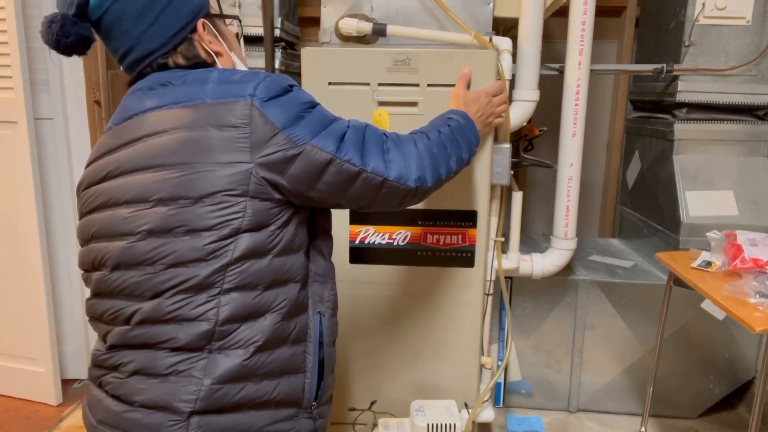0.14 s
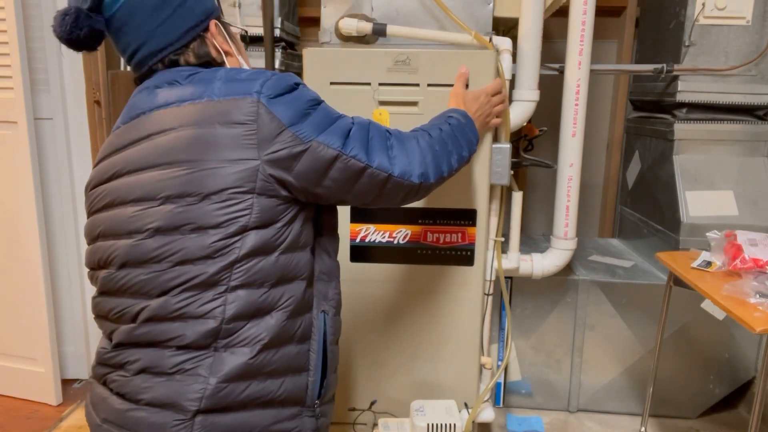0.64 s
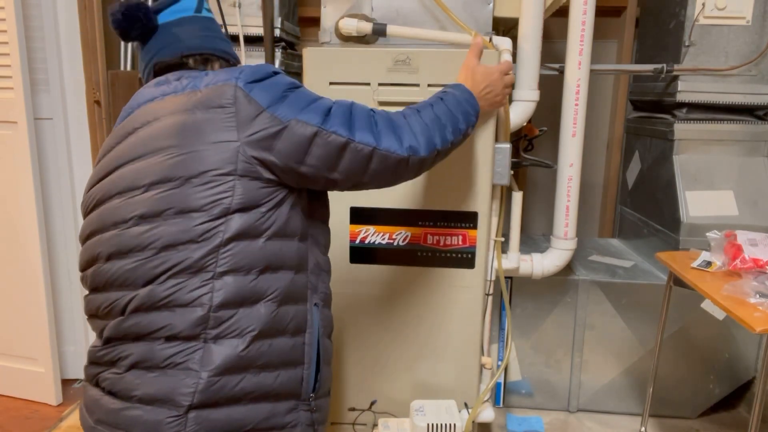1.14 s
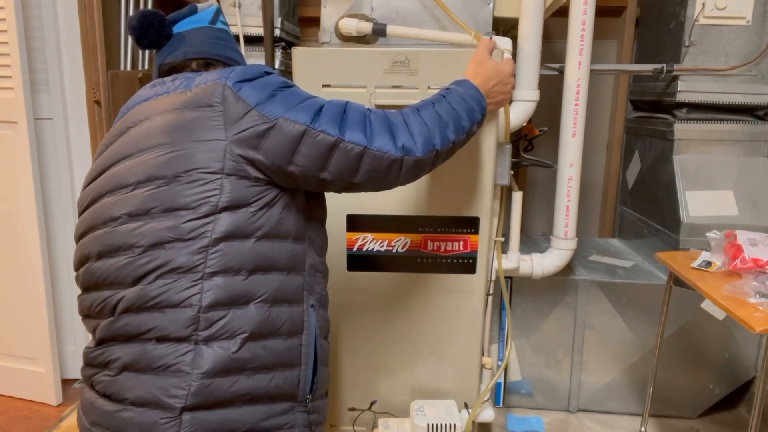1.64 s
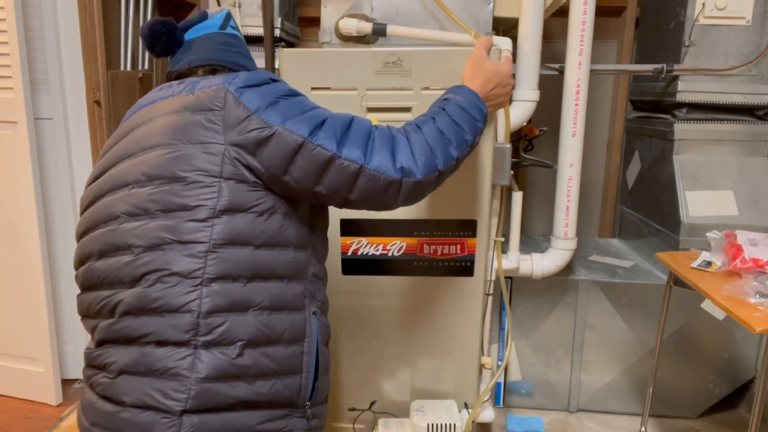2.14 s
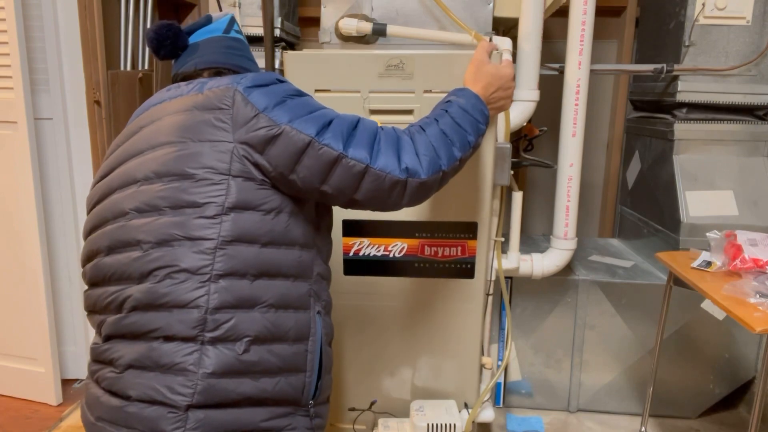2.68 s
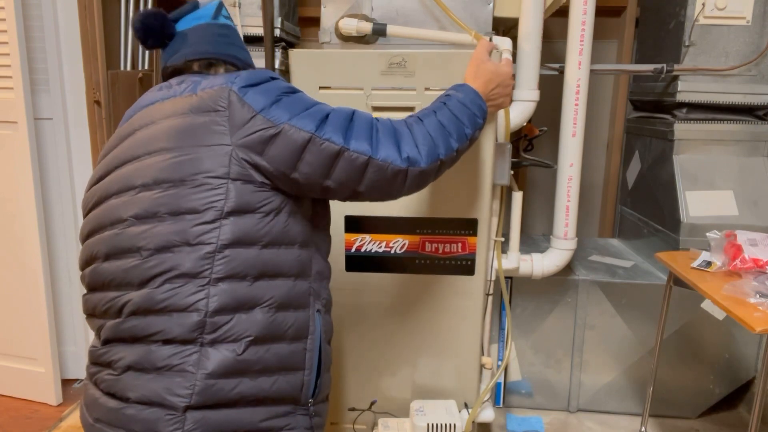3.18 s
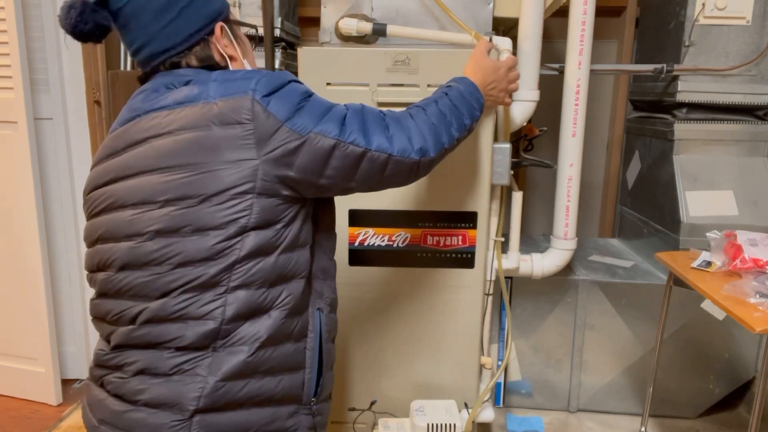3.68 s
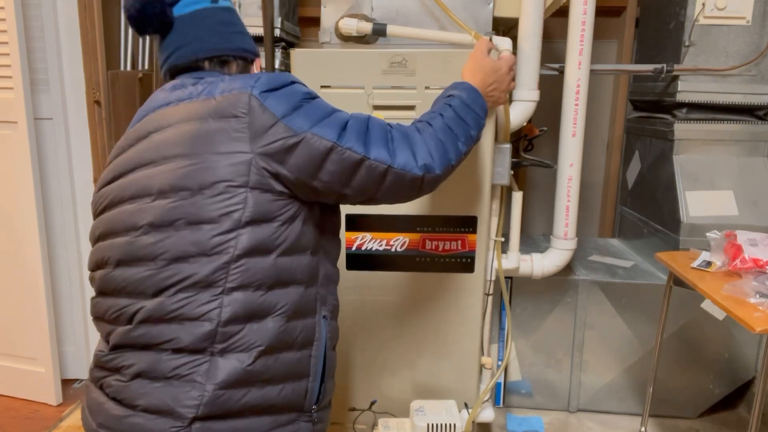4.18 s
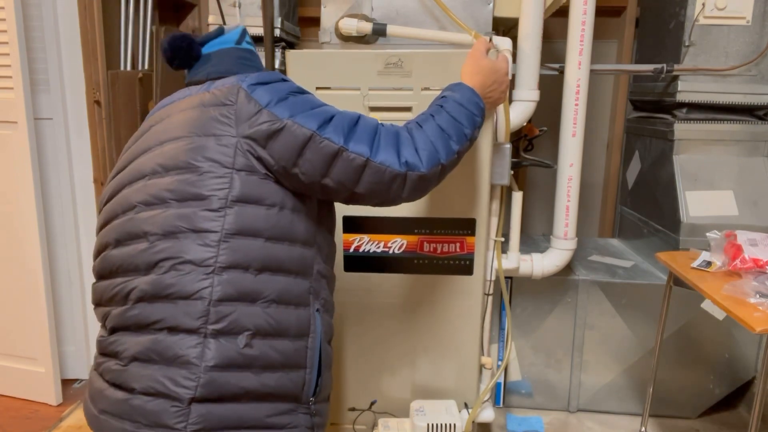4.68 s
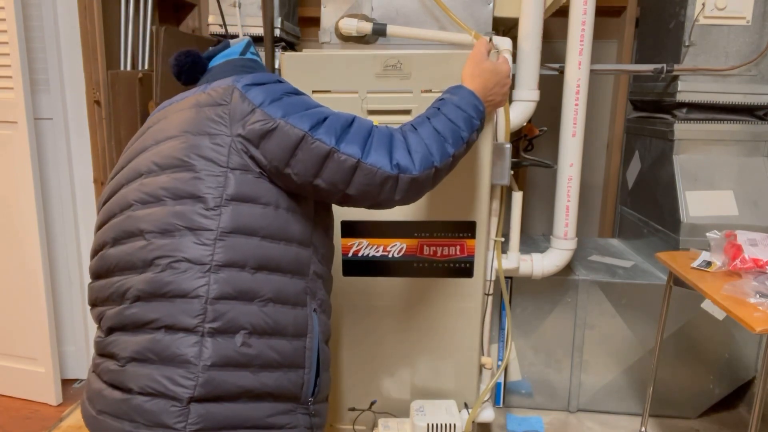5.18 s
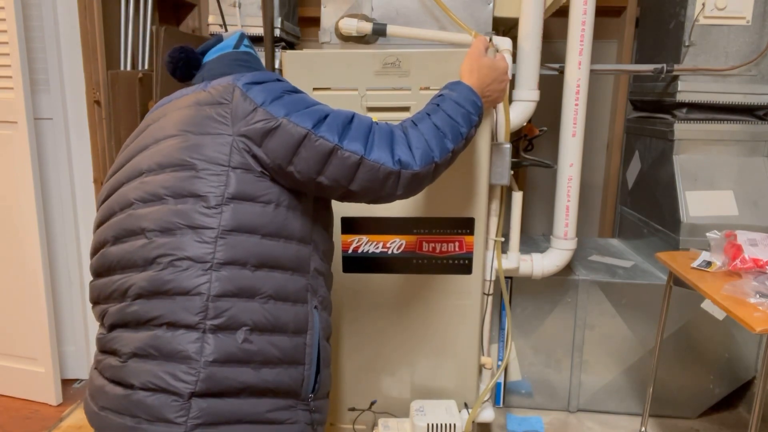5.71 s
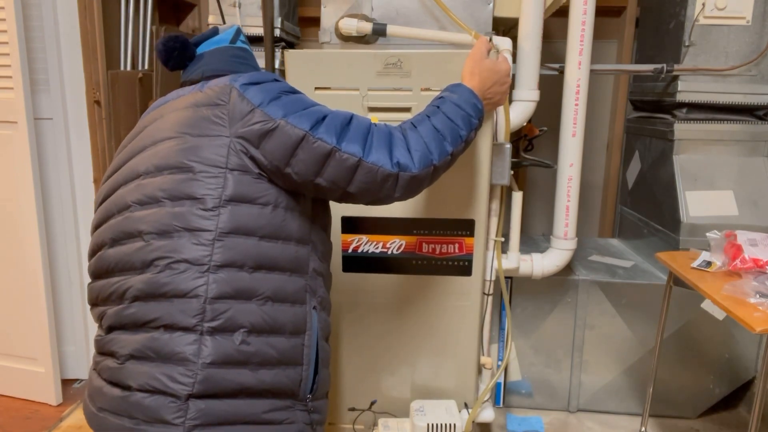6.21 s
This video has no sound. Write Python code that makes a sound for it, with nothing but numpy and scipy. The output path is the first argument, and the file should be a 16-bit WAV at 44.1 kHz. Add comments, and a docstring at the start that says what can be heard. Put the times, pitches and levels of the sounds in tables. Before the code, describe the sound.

A quiet basement with low steady house rumble and faint hiss, heard closely in stereo. Barely audible touches on sheet metal open it; at 0.4 s a quick double clunk with short hollow ring, then a softer tap at 0.6 and a jacket rustle. A light tick comes at 1.1. From 1.6 the panel is shifted: clustered knocks, edge scrape and wobbling low metal rumble, building to a hard bang at 2.14 with rapid clunks until about 2.3, nylon swishing through it. It calms near 2.7. A clunk at 3.1, a sharp bang at 3.34, and the loudest knock at 3.66, followed by rustle and scraping rumble around 3.9. Small taps at 4.0 and 4.5, a faint trembling squeak from 4.55 to 4.8, a tick at 4.87. Near-quiet, then a burst of clunks at 5.8-5.9, strongest at 5.87, and a last moderate knock at 6.3.

```python
"""In a basement, a sheet-metal panel is lifted, slid and knocked into a furnace cabinet.
Each contact adds an edge ping, the decaying modes of the hand-damped sheet and a wash of filtered noise.
Bursty noise through the sheet's modes makes the hands' scrape and rumble; shaped noise is a nylon jacket.
Once the edge squeaks on its rail, a trembling tone with overtones; house rumble and hiss lie beneath.
Two spaced microphones hear it, the left one first."""
import sys
import numpy as np
from scipy import signal
from scipy.fft import rfft, irfft, next_fast_len
from scipy.io import wavfile
from scipy.ndimage import uniform_filter1d, map_coordinates

SR = 44100
rng = np.random.default_rng(int(sys.argv[2]) if len(sys.argv) > 2 else 0)


def volts(x):
    """Linear amplitude factor 10**(x/20) for a level x in dB, scalar or array-like."""
    e = np.asarray(x, float) / 20
    return 10 ** e


def wav_record(signal):
    """Record a signal, one row per channel, as 16-bit PCM in the file named by sys.argv[1]."""
    frames = np.transpose(np.atleast_2d(signal))
    bounded = np.clip(frames, -1, 1)
    # unit amplitude maps onto the largest positive 16-bit level
    quanta = np.round(bounded * 32767).astype(np.int16)
    wavfile.write(sys.argv[1], SR, quanta)


N = 279153  # length in samples
CONTROL_STEP = 64  # samples between points of the slow gains

# steady house sound, relative spectrum: [f/Hz, level/dB per Hz]
HOUSE_SPECTRUM = [(15, -45.5), (25, -20), (42, -12.5), (64, -0.5), (86, -15.5), (169, -29), (198, -22.5),
                  (433, -28), (482, -26), (523, -30.5), (1380, -34.5), (8810, -43), (15500, -60)]
# likeness of left and right: [f/Hz, correlation]
LEFT_RIGHT_LIKENESS = [(60, 0.81), (130, 0.86), (290, 0.59), (640, 0.16), (1200, 0.048), (6500, 0.041),
                       (8300, 0.85), (15000, 0.795)]
# phase by which the left microphone leads: [f/Hz, lead/half turns]
LEFT_LEAD = [(0, 0), (700, .42), (1600, .7), (8900, 5), (11500, 6), (14000, 7), (22050, 10)]
# nylon cloth, relative spectrum: [f/Hz, level/dB per Hz]
NYLON_SPECTRUM = [(700, -41.5), (1200, 0.5), (3000, -2.5), (6500, -5.5), (9000, -7.5), (12500, -11.5),
                  (14000, -10.5), (15800, -24.5)]
# jacket swishes: [start t/s, length t/s, level at start/dB, level at end/dB]
JACKET_SWISHES = [(0, 0.63, -81, -68.5), (0.619, 0.3, -63.5, -61.5), (0.96, 0.16, -69, -75),
                  (1.109, 0.59, -62.5, -73.5), (1.868, 0.085, -65.5, -61.5), (2.155, 0.14, -57.5, -53),
                  (2.44, 0.072, -54.5, -51), (2.934, .14, -86.5, -68.5), (3.098, 0.5, -61, -65),
                  (3.698, 0.21, -52.5, -60.5), (3.965, .7, -65.5, -75), (4.891, 0.16, -63, -75.5),
                  (5.05, .22, -89, -87), (5.301, 0.19, -80.5, -70), (5.566, 0.39, -76, -82),
                  (5.804, .05, -70, -64), (6.147, 0.15, -88, -76)]
# hands on the sheet: [t/s, edge scrape level/dB, sheet rumble level/dB]
HAND_LEVELS = [(0, -79.5, -78), (.28, -81, -75), (.59, -57.5, -61.5), (1.0, -70, -78), (1.58, -68, -69),
               (1.7, -51, -61), (1.8, -54, -43.5), (1.92, -56, -52), (2.03, -61.5, -49), (2.3, -56.5, -46),
               (2.55, -55.5, -57), (2.72, -94, -68.5), (3.03, -86, -79.5), (3.2, -60, -67.5),
               (3.58, -68, -55.5), (3.88, -55, -43), (4.3, -74.5, -63.5), (4.57, -93, -71.5),
               (4.93, -72, -68.5), (5.3, -90, -84.5), (5.55, -71, -75.5), (6.05, -75.5, -53.5),
               (6.33, -81, -62.5)]
# modes of the sheet, before the contact colours and damps them: [f/Hz, relative level/dB, t60/s]
SHEET_MODES = [(54.7, -5, 0.43), (93.95, -4, 0.57), (125, 0.5, 0.74), (166, -1, 0.66), (201, -4, 0.67),
               (241, -2.5, 0.44), (279.9, -3.5, 0.6), (346, -5, 0.29), (414, -1, 0.48), (447.4, -3, 0.37),
               (480, -8.5, 0.75), (520.6, 2, 0.25), (633.7, 4, 0.23), (702.6, 1, 0.4), (780, -2.5, .33),
               (860, 6, 0.14), (955, 2, 0.23), (1051, -1.5, 0.42), (1127, -4, 0.45), (1252, -1.5, 0.22),
               (1334, -16, 0.37), (1737, -4, 0.21), (2120, -5.5, 0.51), (2300, -18.5, 0.47),
               (2430, -20, 0.34), (2870, -20, 0.26), (3300, -14.5, .4)]
# contacts: [t/s, edge level/dB, boom over edge/dB, clatter over edge/dB, favoured boom f/Hz, favoured edge f/Hz]
CONTACTS = [(0.068, -82, 30.5, -15, 93.5, 900), (0.201, -74, 18.5, -1, 70, 890),
            (.404, -56.5, -2, -4, 212, 2430), (.413, -41.5, 2.5, -5.5, 222, 1060),
            (.445, -46.5, 9.5, -17, 92, 980), (.601, -51.5, -1.5, -21, 125, 964),
            (.82, -66.5, 12, -8, 125, 860), (1.105, -56, -13, -7, 102, 2120),
            (1.62, -62, 12.5, -3, 260, 480), (1.642, -50, -7, -4.5, 241, 934),
            (1.657, -45.5, -1.5, -9, 241, 955), (1.743, -44, 12.5, -8.5, 198, 482),
            (1.862, -47.5, 18, 0, 125, 676), (1.938, -51.5, 12.5, -8.5, 125, 934),
            (2.08, -41.5, 3, -13, 320, 1370), (2.141, -26.5, -5.5, -13.5, 201, 1330),
            (2.173, -32.5, 4.5, -18, 268, 504), (2.212, -36, 2.5, -3.5, 201, 860),
            (2.269, -42, 11.5, -27, 166, 780), (2.431, -60, -1.5, 7, 166, 935),
            (2.488, -53, 13, 13, 201, 910), (3.097, -49.5, 7.5, -6.5, 250, 480),
            (3.21, -59.5, -6, 4, 260, 2120), (3.339, -26.5, -2, -23, 250, 903),
            (3.651, -48, -10, -12, 292, 860), (3.662, -20, -4, -18.5, 312, 890),
            (4.028, -52, -6, -15.5, 125, 893), (4.523, -50, -11.5, -31, 231, 917),
            (4.874, -54, -4, -3, 346, 2220), (5.51, -60.5, -10, -10, 171, 900),
            (5.597, -64, 11.5, -6, 164, 940), (5.8, -51.5, -11.5, -11, 200, 900),
            (5.824, -42, -7.5, -12, 202, 917), (5.852, -47, 2, -10, 300, 480),
            (5.867, -31.5, -0.5, -14, 346, 703), (5.909, -38.5, 12.5, -30, 204, 486),
            (6.154, -67.5, 10, 7, 167, 2430), (6.31, -46, 4.5, -18, 241, 888)]
# decay of dense high modes and walls together, before damping: [f/Hz, t60/s]
WASH_DECAY = [(100, 0.34), (400, 0.81), (1000, 0.42), (3000, 0.38), (10000, 0.28)]
# wash of a contact, relative spectrum: [f/Hz, level/dB per Hz]
WASH_SPECTRUM = [(300, 6.5), (700, 12.5), (1100, 12), (1700, 12), (2500, 12.5), (3500, 8), (5000, 3.5),
                 (8000, -3), (12500, 8), (14000, -11), (15800, -21.5), (16200, -58.5)]
# edge slipping on its rail: [t/s, mean slip rate f/Hz, first partial relative level/dB, second likewise/dB]
SQUEAK_TRACK = [(4.55, 426, -54, -69), (4.578, 455, -73, -78), (4.598, 463, -57, -54),
                (4.672, 464, -55.5, -79), (4.728, 455, -62.5, -77), (4.762, 464, -82, -105),
                (4.83, 465, -75.5, -102)]


def unit(x):
    """Scale to rms 1."""
    return x / np.sqrt(np.mean(x ** 2) + 1e-20)


def along(points, hz):
    """Read (frequency, value) points on a log frequency axis."""
    f, v = np.transpose(points)
    return np.interp(np.log(hz + 1), np.log(f + 1), v)


def curves(rows):
    """One value per sample for each column after the time."""
    s, *cols = np.transpose(rows)
    return [np.interp(np.arange(N) / SR, s, c) for c in cols]


def stepwise(gain):
    """Root of the summed power of all rows of a slow gain, read at every sample."""
    total = np.sqrt(np.sum(gain ** 2, 0))
    return np.interp(np.arange(N), np.arange(0, N, CONTROL_STEP), total)


def wobble(rate):
    """A smooth random curve, rate knots a second."""
    knots = rng.standard_normal(int(N * rate / SR) + 4)
    return map_coordinates(knots, [np.arange(N) * rate / SR])


def rough(rate, depth_db):
    """Two noises swelling together in uneven bursts, fast and slow."""
    bursts = wobble(rate) + wobble(rate / 6)
    return rng.standard_normal((2, N)) * volts(depth_db * bursts)


def filtered(x, response):
    """Filter by a complex response of frequency."""
    m = next_fast_len(x.shape[-1] + SR // 2)
    spectrum = rfft(x, m) * response(np.fft.rfftfreq(m, 1 / SR))
    return irfft(spectrum, m)[..., :x.shape[-1]]


def likeness_angle(hz):
    """Angle whose cosine is the left-right likeness."""
    return np.arccos(np.clip(along(LEFT_RIGHT_LIKENESS, hz), -1, 1))


def stereo(pair, response):
    """Mix two unrelated noises as mid and side, so left and right are as alike as the table says."""
    def mid_side(hz):
        half = likeness_angle(hz) / 2
        return response(hz) * [np.cos(half), np.sin(half)]
    mid, side = filtered(pair, mid_side)
    return np.array([mid + side, mid - side])


def basement():
    """Steady house rumble and hiss, noise with slightly uneven level."""
    noise = rough(12, depth_db=1.5)
    return volts(-67) * unit(stereo(noise, lambda hz: volts(along(HOUSE_SPECTRUM, hz))))


def swishes():
    """Gain of the cloth: each swish rises, drifts from its first to its last level and fades."""
    rise_db_per_s, fade_db_per_s = 701, 252.5
    start, length, first_db, last_db = np.transpose(JACKET_SWISHES)[:, :, None]
    t = np.arange(0, N, CONTROL_STEP) / SR - start
    level = first_db + (last_db - first_db) * np.clip(t / length, 0, 1)
    level += rise_db_per_s * np.minimum(t, 0)
    level -= fade_db_per_s * np.maximum(t - length, 0)
    return stepwise(volts(level))


def jacket():
    """Nylon rustles: grainy broadband noise that follows the swishes."""
    noise = rough(160, depth_db=-0.66)
    cloth = unit(stereo(noise, lambda hz: volts(along(NYLON_SPECTRUM, hz))))
    return swishes() * cloth


def resonant(hz, lowest_hz, highest_hz, widen):
    """The sheet's modes between two frequencies as one causal filter, broadened by widen."""
    total = 0
    for k, (centre, db, t60) in enumerate(SHEET_MODES):
        if lowest_hz <= centre < highest_hz:
            loss = 1j * hz * widen / t60
            total = total + (-1) ** k * volts(db) * loss / (centre * centre - hz * hz + loss)
    return total


def hands():
    """Fingers, rail and shudder drive the sheet's upper modes as scrape and lower modes as rumble."""
    scrape_db, rumble_db = curves(HAND_LEVELS)
    edge, body = shudder()
    scrape = unit(stereo(rough(90, depth_db=1.2), lambda hz: resonant(hz, 400, 3600, widen=7)))
    rumble = unit(stereo(rough(30, depth_db=2.0), lambda hz: resonant(hz, 0, 400, widen=8.4)))
    return np.hypot(volts(scrape_db), edge) * scrape + np.hypot(volts(rumble_db), body) * rumble


def modal_ring(t, colour, boom_hz, edge_hz, rise, damping):
    """Decaying sines of the sheet's modes, the boom building slower than the edge."""
    hz, db, t60 = np.transpose(SHEET_MODES)[:, :, None]
    # the place struck drives some modes best
    favour_db = 9 * np.exp(-(np.log(hz / boom_hz) / 0.27) ** 2)
    favour_db += 8 * np.exp(-(np.log(hz / edge_hz) / 0.1) ** 2)
    level = db + colour(hz) + favour_db - 8.5
    level += rng.normal(0, 2.5, hz.shape)
    swell = 1 - np.exp(-t / (rise + 0.0017 + 0.011 * 300 / hz))
    apart = 0.9 * likeness_angle(hz) * rng.normal(0, 1, hz.shape)  # left-right phase, radians
    phase = 2 * np.pi * (hz * t + rng.random(hz.shape))
    shape = volts(level - 60 * t * damping / t60) * swell
    beat_hz = rng.uniform(4, 22, hz.shape)  # each mode beats like a close pair
    shape *= 1 + 0.45 * np.sin(2 * np.pi * (beat_hz * t + rng.random(hz.shape)))
    return np.array([np.sum(shape * np.sin(phase + side * apart / 2), 0) for side in (1, -1)])


def dense(count):
    """The crowded upper modes of the sheet as one peaky gain of frequency."""
    hz, db = 900 * 10 ** rng.random(count), rng.normal(0, 3.62, count)
    grid = np.arange(0, SR / 2, 5.0)[:, None]
    peaks = volts(2 * db) / (1 + ((grid - hz) / (0.005 * hz)) ** 2)
    gain = np.sqrt(0.03 + np.sum(peaks, 1))
    return lambda f: np.where(f > 800, np.interp(f, grid[:, 0], gain), 0.7)


def dense_wash(t, crowd, colour, rise, damping):
    """Noise with frequency-dependent decay, for the dense modes and the walls."""
    f, frame, z = signal.stft(rng.standard_normal((2, len(t))), SR, nperseg=256)
    z = z * volts(-60 * frame * damping / along(WASH_DECAY, f)[:, None])
    wash = signal.istft(z, SR, nperseg=256)[1][:, :len(t)]
    wash = wash * (1 - np.exp(-t / (rise + 0.0072)))
    wash *= volts(np.interp(t, np.arange(64) / 70, rng.normal(0, 3, 64)))  # loose seams rattle
    low_cut = lambda f: f / (f + 60)
    wash = stereo(wash, lambda f: volts(along(WASH_SPECTRUM, f) + colour(f)) * crowd(f) * low_cut(f))
    return wash * np.clip(t / 0.00079, 0, 1)


def edge_ping(t, clatter_db, edge_hz, rise):
    """A short tone of the folded lip and a noisy crack of bare metal; slow blows hardly ping."""
    u = t / 0.0047
    ping = volts(9.0) * u * np.exp(1 - u) * np.sin(2 * np.pi * edge_hz * t)
    ping *= np.exp(-(np.log(edge_hz / 880) / 0.25) ** 2)  # the lip answers best at its own pitch
    crack = uniform_filter1d(rng.standard_normal(len(t)), size=2)
    ping += volts(clatter_db + 3 - 60 * t / 0.018) * crack
    return ping * np.exp(-rise / 0.0074)


def contact(crowd, boom_db, clatter_db, boom_hz, edge_hz, rise, damping):
    """One blow: a ping of the edge, the modes swelling behind it and a wash of dense modes."""
    t = np.arange(int(0.9 * SR)) / SR
    rise = rise + 1e-4
    tilt = [(300, boom_db), (800, 0), (2500, clatter_db), (12000, 0.98 * clatter_db + 2.5)]
    colour = lambda f: along(tilt, f)
    ring = modal_ring(t, colour, boom_hz, edge_hz, rise, damping)
    wash = dense_wash(t, crowd, colour, rise, damping)
    return ring + wash + edge_ping(t, clatter_db, edge_hz, rise)


def panel():
    """All contacts of sheet and cabinet; harder and more clattering blows build up faster."""
    out, crowd = np.zeros((2, N + SR)), dense(count=110)
    for s, db, boom_db, clatter_db, boom_hz, edge_hz in CONTACTS:
        quicker_db = 0.16 * (db + 37.5) + 0.57 * (clatter_db + 18.5)
        rise = 0.0071 * volts(-quicker_db)  # seconds
        # a flat hand (more boom) and metal pressed on metal (much clatter) add damping
        damping = 1.16 + 0.0118 * max(boom_db, -10) + 0.05 * max(clatter_db + 8, 0)
        blow = volts(db) * contact(crowd, boom_db, clatter_db, boom_hz, edge_hz, rise, damping)
        out[:, round(s * SR):][:, :blow.shape[1]] += blow
    return out[:, :N]


def shudder():
    """Gains of edge and body as the loose sheet shudders on its rail after each blow."""
    edge_db, body_db, swell_s, fade_db_per_s = -12.5, -7, 0.04, 149.5
    s, db, boom_db = np.transpose(CONTACTS)[:3, :, None]
    t = np.maximum(np.arange(0, N, CONTROL_STEP) / SR - s, 0)
    shape = volts(db - fade_db_per_s * t) * (1 - np.exp(-t / swell_s))
    return stepwise(volts(edge_db) * shape), stepwise(volts(body_db + boom_db) * shape)


def squeak():
    """The edge sticks and slips on its rail, a trembling tone with overtones."""
    hz, first_db, second_db = curves(SQUEAK_TRACK)
    t = np.arange(N) / SR
    fade_in = np.clip((t - SQUEAK_TRACK[0][0]) / 0.0067, 0, 1)
    fade_out = np.clip((SQUEAK_TRACK[-1][0] - t) / 0.023, 0, 1)
    turn = 2 * np.pi * np.cumsum(hz * (1 + 0.04 * wobble(120))) / SR
    tremble = lambda: volts(3.5 * wobble(60))
    tone = volts(first_db + 5.0) * tremble() * np.sin(turn)
    overtones = np.sin(2 * turn) + volts(-20.0) * np.sin(3 * turn)
    tone += volts(second_db + 9.0) * tremble() * overtones
    return fade_in * fade_out * tone


def scene():
    """All sound leads in the left microphone; all but the house sound is a little weaker there."""
    near = (jacket() + hands() + panel() + squeak()) * volts([[-0.6], [0.6]])

    def lead(hz):
        quarter_turns = np.interp(hz, *np.transpose(LEFT_LEAD))  # half the lead to each side
        return np.exp(1j * np.pi / 2 * quarter_turns * np.array([[1], [-1]]))
    return filtered(basement() + near, lead)


def top_cut(x):
    """Nothing passes above the cut-off."""
    return signal.sosfilt(signal.butter(12, 16010, fs=SR, output="sos"), x)


def record(dry):
    """Deliver the finished mix."""
    return top_cut(dry)


dry = scene()
out = record(dry)
wav_record(out)
```